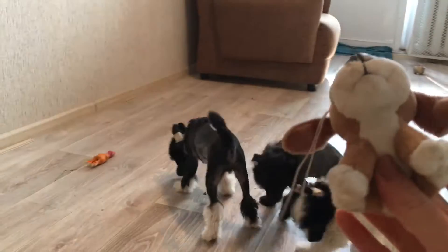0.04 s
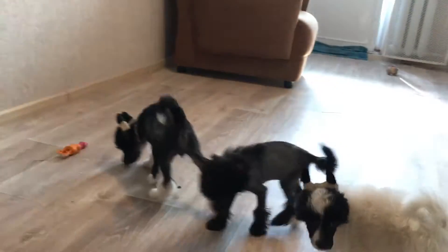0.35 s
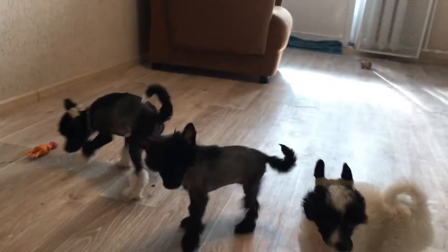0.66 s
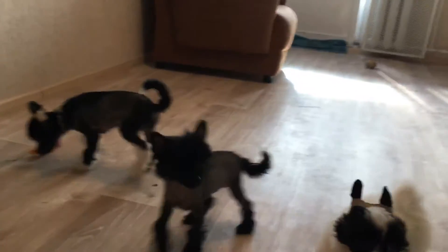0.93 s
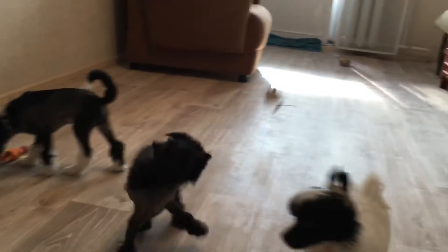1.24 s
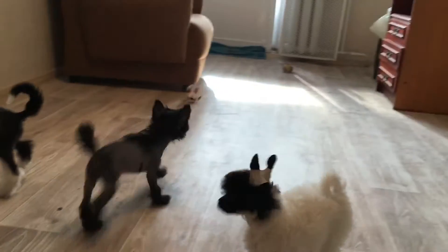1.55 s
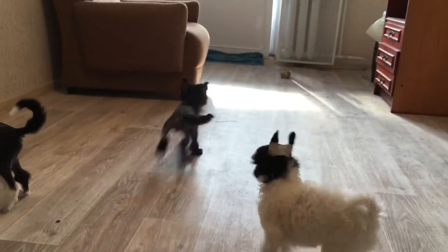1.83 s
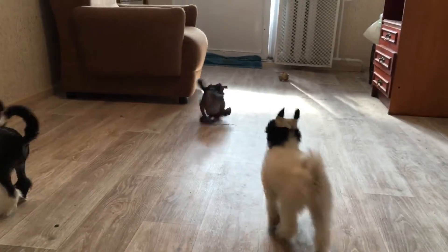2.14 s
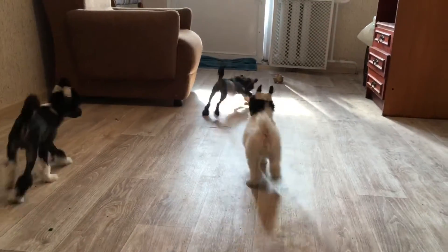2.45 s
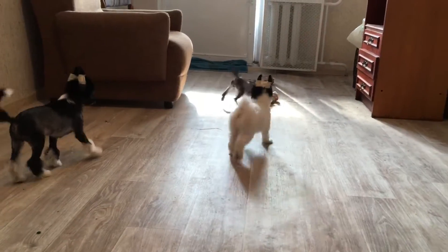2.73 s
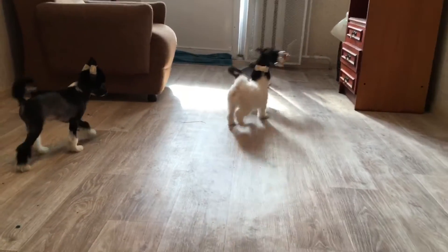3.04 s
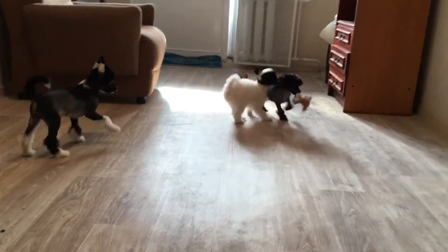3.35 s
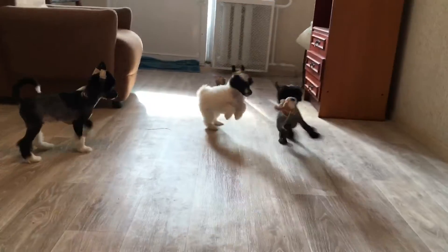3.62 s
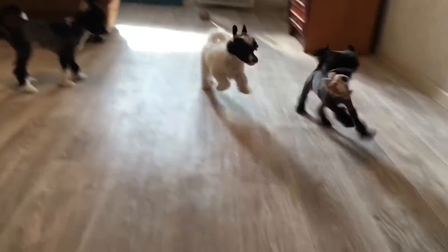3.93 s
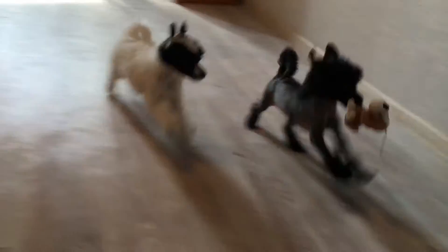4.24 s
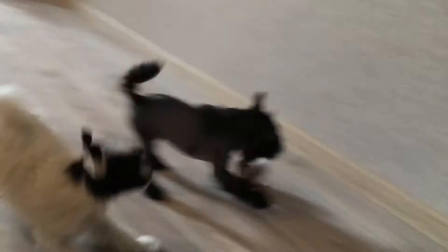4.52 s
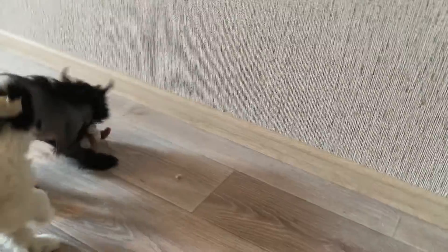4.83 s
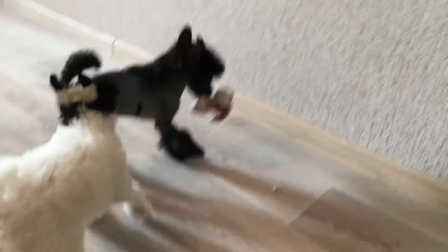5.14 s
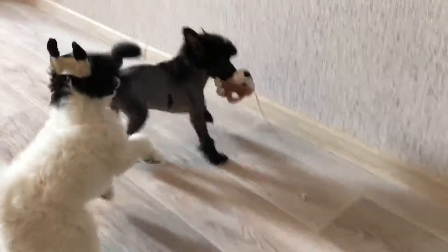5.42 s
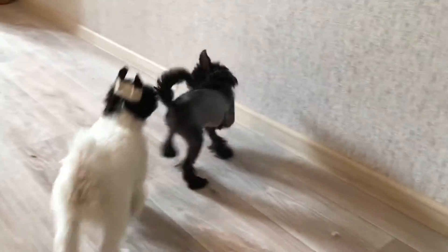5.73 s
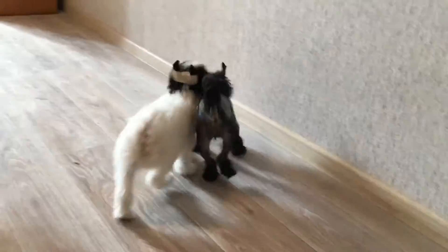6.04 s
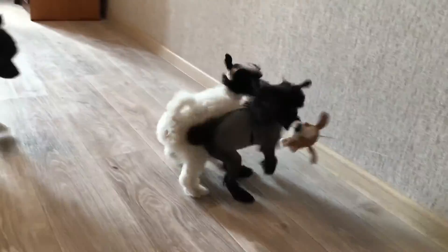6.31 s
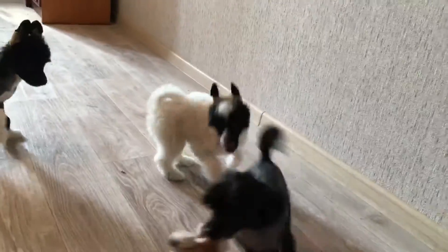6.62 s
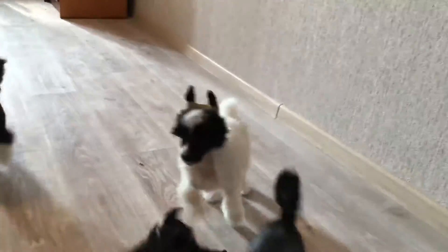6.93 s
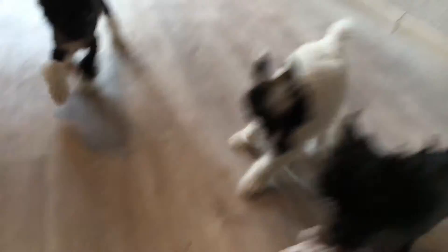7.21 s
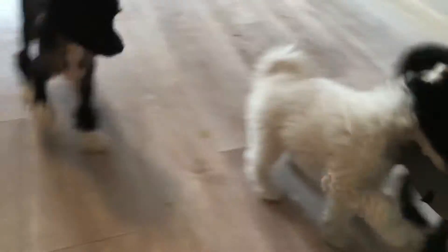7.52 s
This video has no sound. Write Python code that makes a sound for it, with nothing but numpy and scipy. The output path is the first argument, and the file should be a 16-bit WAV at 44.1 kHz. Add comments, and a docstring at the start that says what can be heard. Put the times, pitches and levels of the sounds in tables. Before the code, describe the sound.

Puppies patter, thump and skid on a hard floor in an echoing room, their claws ticking in light, irregular bursts.

```python
"""A puppy trots, pounces and skids on a laminate floor in a bare, echoing room. From the start light steps
patter over the room's hush and the floor booms under its weight. A short hiss ends at 0.1 s in one sharp, close
snap. Claws tick and paws knock the boards; from 1.5 s they also skid, catching and slipping on the grain. At
3.3 s a small hard object clatters. The puppy comes closest near 4.9 s; at the very end a low moan swells."""
import sys
import numpy as np
from scipy import signal
from scipy.io import wavfile
from scipy.ndimage import uniform_filter1d

SR = 44100
rng = np.random.default_rng(int(sys.argv[2]) if len(sys.argv) > 2 else 0)


def master_out(mix):
    """Clip the mix to full scale and print it as 16-bit PCM to the path in sys.argv[1]."""
    frames = np.transpose(np.atleast_2d(mix))
    ceiling = np.clip(frames, -1, 1)
    pcm = np.round(ceiling * 32767).astype(np.int16)
    wavfile.write(sys.argv[1], SR, pcm)


N = 333837
TIME_S = np.arange(N) / SR

# paw landings: t/s, level/dB, board f/Hz
PAW_HITS = [(0.24, -49.5, 934), (0.691, -51.5, 916), (0.796, -52, 1382), (1.135, -54, 930),
            (1.369, -30, 789), (1.384, -33, 780), (1.404, -39, 740), (1.505, -44.5, 770),
            (1.690, -41.5, 1222), (1.778, -42, 860), (1.907, -36, 792), (1.975, -48, 875),
            (2.029, -45, 1620), (2.164, -30, 679), (2.268, -34.5, 1136), (2.354, -36.5, 913),
            (2.606, -36.5, 887), (2.842, -41.5, 967), (2.966, -43, 926), (3.039, -39, 984),
            (3.326, -37.5, 720), (3.347, -32, 713), (3.3555, -31.5, 826), (3.412, -40, 715),
            (3.533, -41, 1026), (3.689, -43, 1073), (3.843, -39, 880), (3.903, -37.5, 744),
            (3.973, -38.5, 660), (4.069, -42.5, 744), (4.103, -42, 650), (4.133, -39, 1222),
            (4.235, -40, 917), (4.357, -30.5, 1323), (4.3754, -29, 1202), (4.453, -40.5, 1185),
            (4.478, -39.5, 1082), (4.604, -39, 1030), (4.693, -31, 1065), (4.7185, -32, 1062),
            (4.8851, -34, 890), (4.955, -44.5, 1050), (5.165, -38, 1022), (5.348, -45.5, 888),
            (5.6425, -43.5, 966), (5.866, -50.5, 1100), (6.0544, -40.5, 982), (6.2727, -32, 1345),
            (6.312, -37, 1017), (6.594, -44, 1101), (6.6545, -38.5, 920), (6.755, -45.5, 686),
            (6.869, -37.5, 1077), (6.9737, -42.5, 948), (7.135, -33, 969), (7.1879, -37.5, 940),
            (7.3743, -39, 760), (7.475, -44.5, 1017), (7.534, -37, 950), (7.559, -45, 974)]
# activity of the puppy: t/s, level/dB
ACTIVITY = [(0.0, -59.5), (0.51, -63), (0.74, -64), (1.41, -57.5), (1.54, -53.5), (2.26, -47.5),
            (3.18, -56.5), (3.37, -51), (3.48, -55), (3.88, -50), (4.01, -48), (4.43, -51.5), (4.6, -45.5),
            (5.0, -55), (5.8, -56), (7.17, -56.5), (7.32, -51.5), (7.57, -54.5)]
# claw tip spectrum: f/Hz, density/dB
CLAW_SPECTRUM = [(300, -15), (900, 10.5), (2200, 5.5), (3000, -1.5), (4100, 2), (5000, -4), (6500, -3),
                 (9400, -9), (10400, -13.5), (12000, -11.5), (16000, -17)]


def amp(db):
    """dB to gain."""
    return 10 ** (np.asarray(db) / 20)


def unit_rms(x):
    """Scale to rms 1."""
    return x / np.sqrt(np.mean(x ** 2) + 1e-20)


def unit_hit(x):
    """Scale to the energy of 4 ms at rms 1."""
    return x * np.sqrt(.004 * SR / (np.sum(x ** 2) + 1e-20))


def at_hz(points, hz):
    """Interpolate over log frequency."""
    f_hz, value = np.transpose(points)
    return np.interp(np.log(hz + 1), np.log(f_hz + 1), value)


def add(mix, start_s, sound):
    """Mix in at start_s."""
    part = mix[max(round(start_s * SR), 0):][:len(sound)]
    part += sound[:len(part)]


def shaped(x, spectrum, size=4096):
    """Minimum-phase filter of unit energy."""
    log_gain = np.log(amp(at_hz(spectrum, abs(np.fft.fftfreq(size, 1 / SR)))))
    response = np.fft.ifft(np.exp(np.conj(signal.hilbert(log_gain)))).real[:size // 2]
    return signal.oaconvolve(x, response / np.linalg.norm(response))[:len(x)]


def grains(count, per_s, spread_db):
    """Random tiny impacts, mostly small, a few large."""
    strength = amp(spread_db * np.minimum(rng.exponential(1, count), 4))
    return strength * rng.choice([-1, 1], count) * (rng.random(count) < per_s / SR)


def in_room(x, wet_db, build_s=0.0038, size=32768):
    """Direct sound, first reflections and diffuse tail, drawn anew for each spot on the floor."""
    # room decay: f/Hz, T60/s
    decay = [(150, 1), (700, 0.484), (2400, 0.815), (4500, 0.698), (8000, 0.571), (15000, 0.592)]
    # first reflections: delay/s, level/dB
    reflections = [(.0074, -18), (0.0114, -27), (0.0165, -31.5)]
    hz, t, spectra = signal.stft(rng.standard_normal(size), SR, nperseg=256)
    tail = signal.istft(spectra * amp(-60 * t / at_hz(decay, hz)[:, None]), SR, nperseg=256)[1]
    tail *= 1 - np.exp(-(np.arange(len(tail)) / SR / build_s) ** 2)
    response = amp(wet_db) * tail / np.linalg.norm(tail)
    response[0] += 1
    for delay_s, db in reflections:
        response[round(delay_s * rng.uniform(.8, 1.25) * SR)] += amp(db)
    return signal.fftconvolve(x, response)


def distance_db(t_s, reference_m=1.604):
    """Gain of room over direct sound as the puppy runs off and returns."""
    # path: t/s, distance to microphone/m
    path = [(1.3, 2.55), (2.2, 2.63), (3.0, 3.35), (3.9, 2.41), (4.4, 0.84), (4.9, 0.69), (5.5, 1.95),
            (7.57, 1.045)]
    return 20 * np.log10(np.interp(t_s, *np.transpose(path)) / reference_m)


def bustle(gain_db, after_paw_db, peak_s):
    """Envelope: overall activity plus a swell after each landing, in proportion to the blow."""
    busy = amp(np.interp(TIME_S, *np.transpose(ACTIVITY)) + gain_db)
    power, age = np.zeros(N), TIME_S[:SR] / peak_s
    for t_s, db, _ in PAW_HITS:
        add(power, t_s, (amp(db) * age * np.exp(1 - age)) ** 2)
    return np.hypot(busy, amp(after_paw_db) * np.sqrt(power))


def room_hush(level_db=-59.5):
    """Steady noise of the room."""
    # hush: f/Hz, density/dB
    spectrum = [(15, -49), (25, -5), (86, 5), (156, -13), (215, -20), (305, -8.5), (469, -23), (826, -25.5),
                (945, -16.5), (1380, -16.5), (2920, -43.5), (3440, -29), (15500, -39)]
    return amp(level_db) * unit_rms(shaped(rng.standard_normal(N), spectrum))


def patter(steps_per_s=170):
    """Light steps rustle on the boards; after each landing the other feet scramble to follow."""
    # light steps: f/Hz, density/dB
    spectrum = [(120, -22.5), (220, -0.5), (310, -5), (460, -2.5), (680, -0.5), (1050, 0), (1900, -2.5),
                (2400, -14.5), (3000, -17), (4000, -17.5), (5000, -22), (9000, -26.5), (15000, -42)]
    steps = shaped(grains(N, steps_per_s, spread_db=2.5), spectrum)
    rustle = unit_rms(in_room(steps, wet_db=3)[:N])
    return bustle(gain_db=-2, after_paw_db=-23, peak_s=0.055) * rustle


def floor_boom():
    """The puppy's weight keeps floor and room booming, more after each landing."""
    # floor and room rumble: f/Hz, density/dB
    spectrum = [(20, -31), (40, -2.5), (52, -24), (65, 1.5), (80, 0.5), (100, -3.5), (114, 5.5),
                (126, -7.5), (140, 4), (165, -5), (200, -14), (300, -16), (380, -18.5), (500, -55)]
    rumble = unit_rms(shaped(rng.standard_normal(N), spectrum, size=16384))
    return bustle(gain_db=-3, after_paw_db=-20, peak_s=0.062) * rumble


def hiss(level_db=-43, size=4410):
    """Noise with narrow resonances, fading within 0.1 s."""
    # hiss: f/Hz, density/dB
    spectrum = [(700, -28.5), (1100, -22.5), (1700, -10.5), (2150, 1), (2500, -10), (2830, 6), (3180, -8.5),
                (3700, 2), (4150, -15), (4550, -2), (6400, -10.5), (8700, -18), (9700, -27.5), (15000, -37)]
    out = np.zeros(N)
    fade = amp(np.interp(TIME_S[:size], [0, .045, .06, .1], [1, -2.5, -9, -24]))
    noise = unit_rms(shaped(rng.standard_normal(size), spectrum))
    add(out, 0, amp(level_db) * in_room(fade * noise, wet_db=-1))
    return out


def thuds(decay_cycles=1.32, size=6000):
    """The floor gives under a soft, heavy blow and swings for a few cycles."""
    # body landings and dull bumps: t/s, level/dB, f/Hz
    bumps = [(0.032, -47, 267.8), (0.476, -52.5, 286), (1.372, -35.5, 384), (1.797, -41.5, 135.5),
             (2.166, -37, 304), (2.476, -41, 137), (2.654, -34.5, 124.8), (2.686, -29, 70.5),
             (3.397, -38, 66), (3.975, -43.5, 109), (4.081, -37, 133.3), (4.385, -36, 138.7),
             (4.631, -45, 260), (4.692, -33.5, 127.7), (5.447, -39.5, 106.7), (5.704, -38, 94.4),
             (6.36, -45.5, 140), (6.748, -44, 127), (6.971, -36.5, 117), (7.219, -46.5, 124.6),
             (7.391, -39, 107.4)]
    out, t = np.zeros(N), TIME_S[:size]
    for t_s, db, hz in bumps:
        swing = np.sin(2 * np.pi * hz * t) * (hz * t) ** .5 * np.exp(-hz * t / decay_cycles)
        add(out, t_s, amp(db) * in_room(unit_hit(swing), wet_db=-6))
    return out


def snap(start_s=.1007, level_db=-23.5, ring_s=0.0004376, crackle_s=0.00203, size=1024):
    """A small cavity swells for two cycles and dies; a fine crackle follows."""
    # cavity modes: f/Hz, level/dB
    modes = [(1350, -14.5), (2050, -4.5), (2450, -0.5), (3350, -10.5), (4330, -5.5), (6800, -20)]
    # crackle: f/Hz, density/dB
    spectrum = [(600, -5.5), (2000, -17.5), (5500, 4), (8000, 9.5), (10000, -8), (11200, -4.5),
                (15000, -25.5)]
    out, t = np.zeros(N), TIME_S[:size]
    swell = (t / ring_s) ** 2 * np.exp(-t / ring_s)
    ring = sum(amp(db) * np.cos(2 * np.pi * hz * (t - 2 * ring_s)) for hz, db in modes)
    cavity = unit_hit(swell * ring)
    crackle = unit_hit(shaped(rng.standard_normal(size) * t * np.exp(-t / crackle_s), spectrum))
    add(out, start_s, amp(level_db) * in_room(cavity + amp(-21) * crackle, wet_db=-3, build_s=0.0026))
    add(out, start_s + 0.0065, amp(level_db - 14) * cavity)  # floor reflection
    return out


def claw_in_room(x, t_s, wet_db, gain_db=-1):
    """Claw sound at the puppy's distance: farther means less direct sound, more room."""
    far_db = 0.68 * distance_db(t_s)
    return amp(gain_db - .5 * far_db) * in_room(x, wet_db + far_db)


def claw_ticks(chatter_s=.0011, lead_s=.0015, lead_db=-21, neighbour_db=-8, size=1024):
    """A claw tip ticks and chatters; its neighbour lands 2-5 ms later."""
    # hard claw strikes: t/s, level/dB
    strikes = [(0.549, -60), (1.132, -57), (1.3619, -47), (1.687, -45.5), (1.978, -42.5), (2.684, -34.5),
               (3.036, -45), (3.535, -43.5), (3.627, -44), (3.681, -45.5), (3.879, -43), (4.1334, -41.5),
               (4.158, -41), (4.365, -34), (4.4668, -44), (4.5752, -36.5), (4.718, -36), (5.1268, -50.5),
               (5.168, -48.5), (5.3461, -53), (5.5265, -53.5), (5.866, -58.5), (6.053, -63), (6.325, -42),
               (6.600, -50.5), (6.611, -41), (6.670, -47), (6.778, -51), (6.785, -52), (6.850, -47.5),
               (6.971, -54), (7.3729, -47), (7.3797, -45.5)]
    before_pads = [(t_s - lead_s, db + lead_db) for t_s, db, _ in PAW_HITS]
    out, t = np.zeros(N), TIME_S[:size]
    for t_s, db in strikes + before_pads:
        tip, neighbour = rng.choice([-1, 1], (2, size)) * np.exp(-t / chatter_s)
        add(tip, rng.uniform(.002, .005), amp(neighbour_db) * neighbour)
        tick = unit_hit(shaped(tip, CLAW_SPECTRUM))
        add(out, t_s + .001, amp(db) * claw_in_room(tick, t_s, wet_db=-1.5))
    return out


def board_spectrum(hz, peak_db, half_width_oct=0.666):
    """Floor spectrum with one board's resonance standing out."""
    # floor: f/Hz, density/dB
    spectrum = [(100, -25), (200, -0.5), (300, -2.5), (450, -7.5), (680, -1.5), (1100, -6.5), (1900, -11),
                (2400, -24.5), (3000, -21), (4200, -24), (8000, -30.5), (16000, -36.5)]
    f_hz = np.geomspace(100, 16000, 60)
    resonance_db = peak_db / (1 + (np.log2(f_hz / hz) / half_width_oct) ** 2)
    return np.transpose([f_hz, at_hz(spectrum, f_hz) + resonance_db])


def board_knock(hz, rise_s=0.00078, ring_s=0.00187, rattle_s=0.0041, rattle_db=-4, size=2048):
    """One damped board resonance plus a short rattle of the modes around it."""
    t = TIME_S[:size]
    rise = 1 - np.exp(-t / rise_s)
    ring = np.sin(2 * np.pi * hz * t) * np.exp(-t / ring_s) * rise
    burst = rng.standard_normal(size) * np.exp(-t / rattle_s) * rise
    rattle = shaped(burst, board_spectrum(hz, peak_db=6))
    return unit_hit(unit_hit(ring) + amp(rattle_db) * unit_hit(rattle))


def underfloor_hum(board_hz, falloff_db_per_oct=14, size=14000):
    """The hollow under the floor hums on; modes near the struck board's pitch answer most."""
    # modes of the hollow: f/Hz, level/dB, T60/s
    modes = [(660.2, 6.5, 0.236), (730, -1.5, 0.2), (1153, -3.5, 0.34), (1536, -10, 0.19)]
    hum, t = np.zeros(size), TIME_S[:size]
    for hz, db, t60_s in modes:
        ring = amp(-60 * t / t60_s) * np.sin(2 * np.pi * (hz * t + rng.random()))
        hum += amp(db - falloff_db_per_oct * abs(np.log2(hz / board_hz))) * unit_hit(ring)
    return hum


def paws(hum_db=-14, shake_db=-6, shake_s=0.0182, size=4096):
    """Each paw knocks its board; the blow spreads through the loose floor into the room."""
    out, t = np.zeros(N), TIME_S[:size]
    for t_s, db, hz in PAW_HITS:
        far_db = distance_db(t_s)
        burst = rng.standard_normal(size) * (t / shake_s) ** .5 * np.exp(-t / shake_s)
        shake = unit_hit(shaped(burst, board_spectrum(hz, peak_db=10)))
        hit = amp(hum_db + far_db) * underfloor_hum(hz)
        add(hit, 0, amp(shake_db + far_db) * shake)
        add(hit, 0, amp(-0.37 * max(far_db, 0)) * board_knock(hz))  # far steps knock less sharply
        add(out, t_s, amp(db) * in_room(hit, wet_db=-5 + .5 * far_db))
    return out


def skids(light_db=-54, light_slips_per_s=5000, catch_db=2.04, pivot_hz=5000):
    """Claws and pads drag over embossed wood grain: dense tiny slips that catch and let go."""
    # skids: t/s, length/s, level/dB, tilt/(dB/oct)
    drags = [(1.467, 0.036, -53.5, 0), (1.596, 0.0563, -58, 3), (1.682, 0.0464, -50.5, 3),
             (1.75, 0.08, -59.5, 1.5), (1.857, 0.094, -59.5, 2.5), (2.107, .028, -52, 4.5),
             (2.151, 0.0237, -36, -5), (2.17, 0.1543, -49.5, 1.5), (2.355, 0.0145, -42.5, -4),
             (2.402, 0.0464, -50.5, 2.5), (2.46, 0.076, -50.5, 2), (2.666, 0.0636, -48.5, 1.5),
             (2.772, 0.0893, -55, 2), (3.147, 0.0514, -52.5, 1.5), (3.342, 0.0189, -42.5, -2.5),
             (3.397, 0.0266, -56, 0.5), (3.53, 0.107, -60.5, 3), (3.765, 0.072, -55, 2),
             (4.124, 0.0293, -55, -1.5), (4.332, 0.0224, -48.5, 1.5), (4.355, 0.068, -48.5, 0.5),
             (4.581, 0.0765, -44, 2), (4.621, 0.1364, -42.5, 0.7), (5.09, 0.076, -62, 1.5),
             (5.362, 0.0224, -53.5, 0), (5.892, 0.058, -69.5, 1), (6.087, 0.068, -61, 2.5),
             (6.22, 0.07, -54.5, 2), (6.324, 0.0131, -46, -1), (6.592, 0.0296, -46.5, -2.5),
             (6.728, 0.031, -59.5, 1), (6.842, 0.0217, -57, -2), (7.136, 0.079, -49.5, -4),
             (7.319, 0.0427, -56, -0.5), (7.359, 0.0253, -48, -2), (7.427, 0.0678, -57.5, 2),
             (7.527, 0.061, -55, -1.5)]
    out = np.zeros(N)
    for t_s, length_s, db, db_per_oct in drags:
        count = int(length_s * SR)
        force = amp(db - light_db)  # harder push: more slips, more alike in size
        slips = grains(count, light_slips_per_s * force, spread_db=3 / np.sqrt(max(force, 1)))
        drift = unit_rms(uniform_filter1d(rng.standard_normal(count), 300, mode="wrap"))
        spectrum = [(hz, tone_db + db_per_oct * np.log2(hz / pivot_hz)) for hz, tone_db in CLAW_SPECTRUM]
        scrape = unit_rms(shaped(amp(catch_db * drift) * slips, spectrum))
        fade = unit_rms(signal.windows.tukey(count, 0.376))
        add(out, t_s, amp(db) * claw_in_room(scrape * fade, t_s, wet_db=0))
    return out


def clatter(contact_s=0.0039, size=1500):
    """A small hard object, such as a toy, rasps and knocks on the boards across the room."""
    # bounces: t/s, level/dB
    bounces = [(3.347, -38.5), (3.359, -48), (3.372, -53), (3.408, -60), (3.432, -60)]
    # contact: f/Hz, density/dB
    spectrum = [(800, -22.5), (1700, -1.5), (2400, -2), (2850, -1.5), (3300, -8), (4500, -14.5),
                (8000, -23), (15000, -41.5)]
    out, t = np.zeros(N), TIME_S[:size]
    for t_s, db in bounces:
        burst = rng.standard_normal(size) * np.exp(-t / contact_s)
        add(out, t_s, amp(db) * in_room(unit_hit(shaped(burst, spectrum)), wet_db=5))
    return out


def moan(start_s=7.465, gain_db=-54, roughness=0.122, suboctave_db=-6):
    """A low, unsteady tone swells and rises a little, over a weaker one an octave below."""
    out, t = np.zeros(N), TIME_S[TIME_S > start_s]
    waver = roughness * unit_rms(uniform_filter1d(rng.standard_normal(len(t)), 200))
    pitch_hz = np.interp(t, [7.47, 7.57], [255, 284]) * (1 + waver)
    phase = 2 * np.pi * np.cumsum(pitch_hz) / SR
    tone = unit_rms(np.sin(phase) + amp(suboctave_db) * np.sin(phase / 2))
    swell = amp(np.interp(t, [7.465, 7.48, 7.52, 7.56], [-20.5, 10.0, 5.5, 12.0]))
    add(out, start_s, amp(gain_db) * in_room(swell * tone, wet_db=-3))
    return out


def scene():
    """All sources at one microphone."""
    floor = paws() + claw_ticks() + skids() + thuds() + clatter() + patter() + floor_boom()
    return (floor + hiss() + snap() + moan() + room_hush())[None]


def record(dry):
    """Low-pass at 15.78 kHz."""
    lowpass = signal.firwin(511, 15780, window=("kaiser", 9), fs=SR)
    return signal.oaconvolve(dry, lowpass[None], "same")


dry = scene()
out = record(dry)
master_out(out)
```